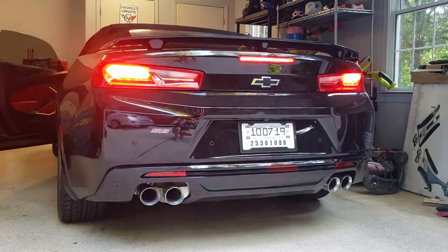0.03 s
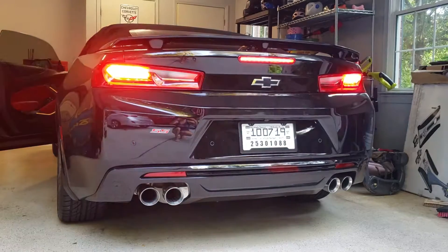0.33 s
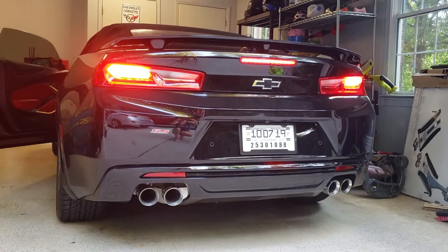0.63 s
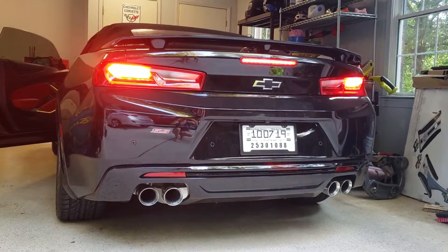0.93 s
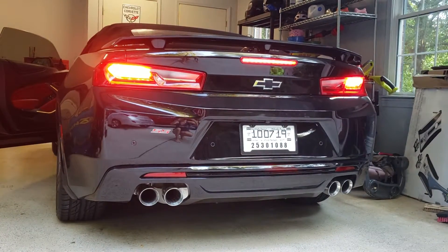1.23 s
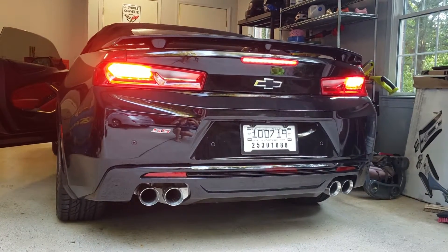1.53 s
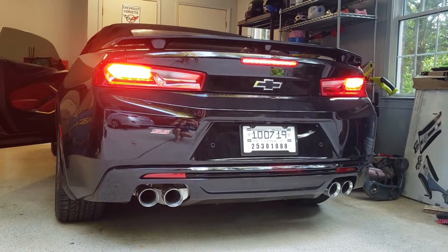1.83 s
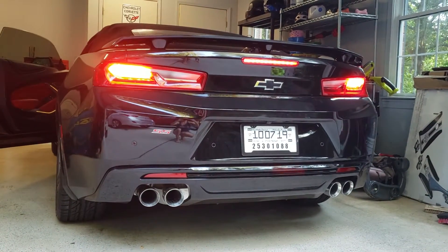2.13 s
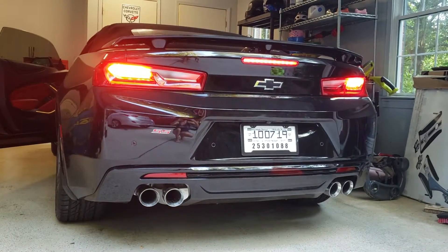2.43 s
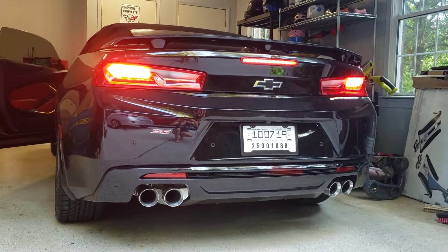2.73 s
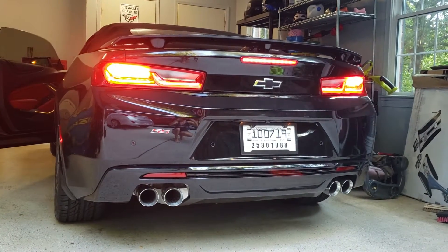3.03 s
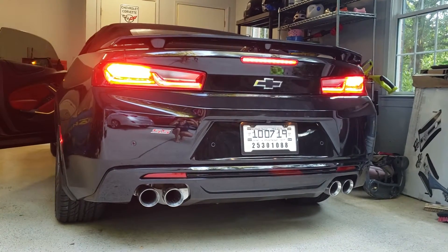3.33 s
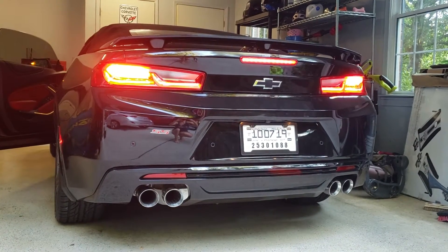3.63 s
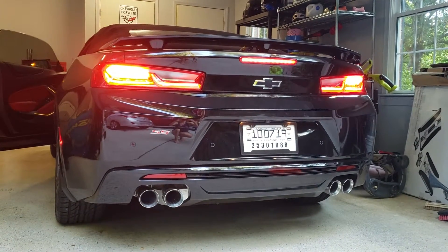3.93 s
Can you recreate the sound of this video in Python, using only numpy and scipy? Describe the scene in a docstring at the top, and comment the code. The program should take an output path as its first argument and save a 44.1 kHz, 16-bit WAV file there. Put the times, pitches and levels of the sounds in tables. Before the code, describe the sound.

A car engine cranks, coughs and catches with a loud, crackling exhaust flare in a garage.

```python
"""A low room rumble, then soft whirs, a whining fuel pump and clicking relays: a cold V8 in a garage,
heard from just behind its tailpipes. The starter's gears clatter and grind through seven compressions.
The engine coughs, catches, flares with a hard crackle and begins to settle to a fast idle.
Each firing rings the exhaust pipe as a thump and leaves its tip as a burst of turbulent gas."""
import sys
import numpy as np
from scipy import signal
from scipy.fft import rfft, irfft
from scipy.io import wavfile
from scipy.ndimage import uniform_filter1d

SR = 44100
rng = np.random.default_rng(int(sys.argv[2]) if len(sys.argv) > 2 else 0)


def transcribe(signal):
    """Save signal, clipped to [-1, 1], as a 16-bit WAV file at the path in sys.argv[1]."""
    frames = np.atleast_2d(signal).T
    limited = np.clip(frames, -1, 1)
    pcm = np.round(limited * 32767).astype(np.int16)
    wavfile.write(sys.argv[1], SR, pcm)


N = 176400
T = np.arange(N) / SR
HZ = np.fft.rfftfreq(N, 1 / SR)


def amp(db):
    """Decibels to gain."""
    return 10 ** (np.asarray(db) / 20)


def unit_rms(x):
    """Scales to rms 1."""
    return x / np.sqrt(np.mean(x ** 2) + 1e-20)


def read(points, hz):
    """Reads a table along a log-frequency axis."""
    f, value = np.transpose(points)
    return np.interp(np.log(hz + 1), np.log(f + 1), value)


def curve(points, t=T):
    """Each column of a time table, joined by straight lines."""
    s, *columns = np.transpose(points)
    return [np.interp(t, s, c) for c in columns]


def add(mix, s, sound):
    """Mixes a sound in at s seconds."""
    part = mix[..., round(s * SR):][..., :sound.shape[-1]]
    part += sound[..., :part.shape[-1]]


def response(points, size=8192):
    """Causal impulse response of a spectrum, energy 1."""
    log_gain = np.log(amp(read(points, abs(np.fft.fftfreq(size, 1 / SR)))))
    h = np.fft.ifft(np.exp(np.conj(signal.hilbert(log_gain)))).real[:size // 2]
    return h / np.linalg.norm(h)


def colour(x, points):
    """Passes channels through an EQ curve."""
    return signal.oaconvolve(x, response(points)[None], axes=1)[:, :N]


def wander(hz):
    """Random drift of rms 1, rolling off above hz."""
    return unit_rms(irfft(rfft(rng.standard_normal(N)) * np.exp(-(HZ / hz) ** 2), N))


def swell(start, rise):
    """A hump that peaks at 1 after its rise time."""
    u = np.maximum(T - start, 0) / rise
    return (u * np.exp(1 - u)) ** 2


def rubbing(hz, width):
    """Stereo noise in a resonance that follows a frequency curve."""
    turn, r = np.exp(2j * np.pi * np.cumsum(hz) / SR), np.exp(-np.pi * width / SR)
    band = signal.lfilter([(1 - r) ** 2], [1, -2 * r, r * r], rng.standard_normal((2, N)) / turn)
    return unit_rms((turn * band).real)


# Stereo image of the room: f/Hz, left-right correlation
LIKENESS = [(60, 1), (130, 0.95), (290, 0.95), (640, 0.52), (1400, 0.079), (3100, 0)]
def diffuse(db):
    """Stereo noise with a given spectrum, centred in the bass and wide on top."""
    a, b = rfft(rng.standard_normal((2, N)))
    same = np.clip(read(LIKENESS, HZ), -1, 1)
    return unit_rms(irfft(np.array([a, same * a + np.sqrt(1 - same ** 2) * b]) * amp(db), N))


# Room tone spectrum: f/Hz, level/dB
ROOM_TONE = [(15, -47), (25, -20), (54, 6), (101, 0), (150, -3.5), (245, -6), (310, -14), (655, -19),
             (1210, -31.5), (1700, -36.5), (3100, -41), (3700, -25), (4400, -47.5), (5600, -36.5),
             (7700, -44.5), (8600, -82), (12000, -47), (15000, -60)]
def room_rumble(level_db=-49, waver_db=1.23):
    """A low bed of noise that wavers slightly."""
    return amp(level_db) * diffuse(read(ROOM_TONE, HZ)) * amp(waver_db * wander(18))


# Whir and hiss cues: t/s, rise/s, centre/Hz, width/octaves, level/dB
WHIR_CUES = [(.04, 0.14, 2500, 0.93, -68), (.54, 0.061, 6700, 0.18, -62), (.6, 0.12, 4200, 0.65, -65.5),
             (.85, 0.18, 5600, 0.06, -72), (1.68, 0.13, 2100, 0.9, -60.5), (1.88, .035, 14000, .22, -73),
             (2.03, 0.097, 2220, 1, -60), (2.08, 0.065, 13500, .17, -64)]
def actuators():
    """Small actuators whir in soft swells of band noise."""
    out = np.zeros((2, N))
    for s, rise, centre_hz, width, db in WHIR_CUES:
        band_db = -4.3 * (np.log2((HZ + 1) / centre_hz) / width) ** 2
        out += amp(db) * swell(s, rise) * diffuse(band_db)
    return out


# Pump pitch and fade: t/s, fundamental/Hz, level/dB
PUMP_RUN = [(.52, 1500, -93), (.56, 1494, -71.5), (.7, 1480, -68), (.78, 1460, -70), (.88, 1465, -73),
            (1.0, 1480, -79), (1.2, 1450, -100)]
# Pump timbre: harmonic number, level/dB
PUMP_PARTIALS = [(2, -1), (3, -6), (4, -21)]
def fuel_pump(flutter_db=4, pitch_waver=.007):
    """The pump primes with a thin, fluttering whine."""
    hz, db = curve(PUMP_RUN)
    turns = np.cumsum(hz * (1 + pitch_waver * wander(230))) / SR
    whine = sum(amp(d) * np.sin(2 * np.pi * k * turns) for k, d in PUMP_PARTIALS)
    return amp(db + flutter_db * wander(70)) * whine


# Relay clicks: t/s, level/dB, ring/Hz
RELAY_CUES = [(.686, -36, 1650), (.708, -33, 1800), (0.83, -45, 2580), (1.319, -49, 5930),
              (1.796, -55, 7500), (2.05, -56, 8000)]
def relays(ring_s=.0022, snap_s=.0011):
    """Each relay clicks with a bright snap and a tiny ring."""
    out, t = np.zeros((2, N)), T[:1000]
    band = signal.butter(2, [1300, 7500], "band", fs=SR)
    for s, db, hz in RELAY_CUES:
        snap = signal.lfilter(*band, rng.standard_normal((2, len(t)))) * np.exp(-t / snap_s)
        ring = np.sin(2 * np.pi * hz * t) * np.exp(-t / ring_s)
        add(out, s, amp(db) * (.39 * ring + .86 * snap))
    return out


# Thin whines: t/s, length/s, f/Hz, level/dB, half-width/Hz
WHINE_CUES = [(.85, 0.19, 1644, -70, 29.4), (0.838, 0.17, 3390, -65, 61.3), (2.478, 0.14, 1925, -31, 60),
              (2.61, 0.12, 605, -32, 60), (2.77, 0.11, 605, -33, 60), (2.915, 0.083, 360, -29.5, 30),
              (2.98, 0.057, 1815, -31, 60), (3.054, 0.18, 355, -35, 34.8)]
def thin_whines(rise_s=.018, sag=.011):
    """Small motors and parts sing in brief, rough tones that sag a little: two while the pump primes, the rest
    shaken by the starter."""
    out = np.zeros((2, N))
    for s, length, hz, db, half_width in WHINE_CUES:
        age = np.clip((T - s) / length, 0, 1)
        pitch = hz * (1 + sag * (.5 - age))
        tone = np.sin(2 * np.pi * np.cumsum(pitch) / SR)
        envelope = np.clip((T - s) / rise_s, 0, 1) * np.sqrt(1 - age)
        out += amp(db) * envelope * (.75 * tone + .47 * rubbing(pitch, 2 * half_width))
    return out


# Garage reverb time: f/Hz, T60/s
GARAGE_DECAY = [(100, 0.19), (1000, 0.98), (4000, 0.081), (15000, 0.12)]
def garage(x, wet_db, size=22050):
    """Direct sound plus dense reflections, unrelated left and right."""
    echoes = rng.standard_normal((2, size)) * (rng.random((2, size)) < .08) * (T[:size] > .003)
    hz, t, z = signal.stft(echoes, SR, nperseg=256)
    tail = signal.istft(z * amp(-60 * t / read(GARAGE_DECAY, hz)[:, None]), SR, nperseg=256)[1]
    tail /= np.linalg.norm(tail, axis=1, keepdims=True)
    return x + amp(wet_db) * signal.fftconvolve(x, tail, axes=1)[:, :N]


def metallic(x, depth_db):
    """Ever-changing metallic resonances: the spectrum swells and dips in short narrow patches."""
    z = signal.stft(x, nperseg=512, noverlap=384)[2]
    patches = uniform_filter1d(rng.standard_normal(z.shape[1:]), size=3, axis=0)
    patches = unit_rms(uniform_filter1d(patches, size=14, axis=1))
    return signal.istft(z * amp(depth_db * patches), nperseg=512, noverlap=384)[1][:, :N]


# Starter fader: t/s, level/dB
STARTER_LEVEL = [(2.165, -88), (2.173, -40), (2.181, -37), (2.186, -27), (2.21, -27.5), (2.26, -35),
                 (2.34, -35), (2.48, -35.5), (2.58, -36.5), (2.78, -35), (3.1, -35), (3.5, -31.5),
                 (3.7, -39), (4.0, -46.5)]
# Gear mesh pitch: t/s, f/Hz
GEAR_MESH = [(2.17, 254), (2.28, 692), (2.42, 915), (2.48, 688), (2.6, 990), (2.66, 827), (2.74, 1020),
             (2.8, 875), (3.0, 1038), (3.28, 1060), (3.6, 1302)]
# Gear clatter EQ: f/Hz, level/dB
GEAR_EQ = [(30, -14), (60, -17), (140, 1), (230, 3), (350, 2.5), (800, 1.5), (1800, 2), (2150, -1.5),
           (3200, 0), (4200, 2.5), (5400, 4), (6900, 1.5), (7700, -2), (8050, -3.5), (8350, -13.5),
           (10500, -6.5), (12000, -4), (13300, -6.5), (15600, -10.5)]
def starter(ticks_per_s=5000, spread_db=3, whine_db=-27.5, scrape_db=-8.5):
    """Gear teeth clatter, scrape and whine, a touch louder under the load of each compression."""
    ticks = (rng.random((2, N)) < ticks_per_s / SR) * rng.choice([-1, 1], (2, N))
    ticks = unit_rms(ticks * amp(spread_db * np.minimum(rng.exponential(1, (2, N)), 4)))
    mesh_hz = curve(GEAR_MESH)[0]
    turns = np.cumsum(mesh_hz * (1 + .012 * wander(59.1))) / SR
    whine = unit_rms(sum(np.sin(2 * np.pi * (k * turns + rng.random())) for k in range(2, 9)))
    scrape = rubbing(6.75 * mesh_hz, width=1100)
    load = sum(swell(s, GRIND_RISE_S) for s, _, _ in COMPRESSIONS)
    fader = amp(curve(STARTER_LEVEL)[0]) * (1 + .049 * load) * (T > STARTER_LEVEL[0][0])
    gears = (ticks + amp(whine_db) * whine + amp(scrape_db) * scrape) * fader
    return metallic(garage(colour(gears, GEAR_EQ), wet_db=-3), depth_db=2.5)


GRIND_RISE_S, PUFF_RISE_S = .033, .014
# Compression strokes: t/s, puff/dB, grind/dB
COMPRESSIONS = [(2.406, -37.5, -32), (2.604, -35.5, -29), (2.746, -32.5, -28), (2.865, -34.5, -29.5),
                (2.97, -34, -29.5), (3.074, -30.5, -27), (3.168, -40.5, -29.5)]
# Tailpipe puff spectrum: f/Hz, level/dB
PUFF_EQ = [(20, -43), (48, 15.5), (80, -16), (135, 8), (200, -13), (280, -7), (450, -46), (2000, -68)]
# Loaded gear spectrum: f/Hz, level/dB
GRIND_EQ = [(100, -32), (270, 6.5), (450, -6.5), (620, -0.5), (850, -1.5), (1200, 3), (1800, -1.5),
            (2600, -4), (6000, -6.5), (8500, -17), (16000, -16.5)]
def compressions():
    """Each stroke grinds the starter's gears and pushes a low puff of air from the pipe."""
    grind = diffuse(read(GRIND_EQ, HZ)) * sum(amp(db) * swell(s, GRIND_RISE_S) for s, _, db in COMPRESSIONS)
    air = diffuse(read(PUFF_EQ, HZ)) * sum(amp(db) * swell(s, PUFF_RISE_S) for s, db, _ in COMPRESSIONS)
    puffs, puff = np.zeros(N), response(PUFF_EQ)
    for s, db, _ in COMPRESSIONS:
        add(puffs, s, amp(db) * puff / abs(puff).max())
    return grind + puffs + air


BOOM_RISE_S, LEAD_S, RASP_DECAY_S = .012, .0011, .011
# First uneven firings: t/s, thump/dB, crackle/dB, boom/dB, boom/Hz
COUGH_CUES = [(3.29, -13.5, -24.5, -9, 50), (3.358, -11, -21, -10, 50), (3.413, -10.5, -31, -11, 88),
              (3.43, -4.5, -23, -6.5, 58.6), (3.444, -7.5, -32, -14.5, 54), (3.467, -7, -25, -11, 69),
              (3.4786, -9, -19, -17, 79)]
def cough_booms(decay_s=.019, lag_s=.0019):
    """Each cough sets off a short bass boom in the exhaust."""
    out, t = np.zeros(N), T[:8192]
    envelope = (1 - np.exp(-t / BOOM_RISE_S)) * np.exp(-t / decay_s)
    for s, _, _, db, hz in COUGH_CUES:
        boom = -np.sin(2 * np.pi * hz * t) * envelope
        add(out, s + lag_s, amp(db) * boom / abs(boom).max())
    return out


# Rev curve: t/s, firing rate/Hz
REVS = [(3.49, 68), (3.52, 88), (3.5825, 97), (3.64, 104), (3.74, 105), (3.85, 106.5), (4.0, 101)]
# Engine effort: t/s, thump/dB, crackle/dB
ENGINE_LEVELS = [(3.49, -7.5, -18), (3.52, -8, -15.5), (3.55, -3.5, -13.5), (3.6, -5, -10), (3.7, -7, -21),
                 (3.74, -8, -26), (3.79, -7.5, -26), (3.85, -8, -26.5), (3.91, -12.5, -29.5),
                 (4.0, -11, -35.5)]
# Cylinder accents in firing order: thump/dB, crackle/dB
ACCENTS = [(-2, 0.5), (-7, -3.5), (-0.5, -7), (-3, -3), (-3, -4), (-4, -3), (-2, -6.5), (-4.5, -11)]
def engine_firings(catch_s=3.4918, jitter_s=.0004, scatter_db=(1.8, 1.2)):
    """Eight uneven cylinders fire in turn; returns rows of t/s, thump/dB, crackle/dB."""
    count = np.cumsum(curve(REVS)[0] * (T >= catch_s)) / SR
    s = T[np.flatnonzero(np.diff(np.ceil(count)))]
    scatter = rng.standard_normal((100, 3))[:len(s)] * [jitter_s, *scatter_db]
    accents = np.array(ACCENTS)[np.arange(len(s)) % len(ACCENTS)]
    return np.column_stack([s, np.transpose(curve(ENGINE_LEVELS, s)) + accents]) + scatter


# Exhaust pipe resonances: f/Hz, level/dB
PIPE_EQ = [(10, -69), (30, -23), (50, -2), (75, 7), (105, 4.5), (135, 3), (165, 3), (210, 0.5), (245, 1.5),
           (268, 6), (298, -20), (370, -16.5), (430, -9), (490, -18.5), (545, -8), (578, -26), (620, -8.5),
           (665, -6.5), (790, -27), (850, -22.5), (950, -30.5), (2000, -45), (5000, -104)]
def pipe_thumps(firings, slow_valve_hz=250, cough_tail_s=.035, burble_db=-17.5):
    """Firings ring the pipe and rushing gas burbles in it; slowly opening valves dull the coughs."""
    pipe, t = response(PIPE_EQ, size=32768), T[:8192]
    pipe /= abs(pipe).max()
    dull = signal.sosfilt(signal.butter(2, slow_valve_hz, fs=SR, output="sos"), pipe)
    cough_flow = (1 - np.exp(-t / BOOM_RISE_S)) * np.exp(-t / cough_tail_s)
    rasp = np.exp(-t / RASP_DECAY_S)
    thumps, flow = np.zeros((2, N))
    for s, db, *_ in COUGH_CUES:
        add(thumps, s - LEAD_S, amp(db) * dull)
        add(flow, s, amp(db) * rasp + amp(db - 1) * cough_flow)
    for s, db, _ in firings:
        add(thumps, s - LEAD_S, amp(db) * pipe)
        add(flow, s, amp(db) * rasp)
    return thumps + amp(burble_db) * colour(flow * rng.standard_normal((1, N)), PIPE_EQ)[0]


# Firings that leave the pipe as a hard pop: t/s, level/dB
HARD_POPS = [(3.5823, -10), (3.6237, -6), (3.662, -10.5), (3.7003, -7.5), (3.8141, -18.5), (3.890, -24)]
# Tailpipe crackle EQ: f/Hz, level/dB
CRACKLE_EQ = [(100, -43.5), (400, -4.5), (680, 1.5), (900, -14.5), (1150, -3.5), (1550, 5), (2000, -4),
              (2350, -4), (2700, 2.5), (3000, -1.5), (3200, -13.5), (3420, -6.5), (3700, -15),
              (4500, -12.5), (7500, -28), (8600, -48), (16000, -28)]
def tip_crackle(firings, rise_s=.00024, crack_s=.002, pop_s=.0026, rasp_db=-11, right_lag_s=.00007):
    """Coughs chuff from the tip; later firings leave it as a shock with a burst of turbulence."""
    t = T[:8192]
    shocks, gas = np.zeros((2, N))
    opening = 1 - np.exp(-t / rise_s)
    burst = opening * (np.exp(-t / crack_s) + amp(rasp_db) * np.exp(-t / RASP_DECAY_S))
    for s, _, db, _, _ in COUGH_CUES:
        gas += amp(db - 3) * swell(s - LEAD_S, rise=.0043)
    for s, _, db in firings:
        if min(abs(s - pop) for pop, _ in HARD_POPS) > .004:  # else a pop takes its place
            add(shocks, s, amp(db) * np.array([-3]))
            add(gas, s, amp(db) * burst)
    for s, db in HARD_POPS:
        add(shocks, s, amp(db) * np.array([-4]))
        add(gas, s, amp(db) * opening * np.exp(-t / pop_s))
    crack = shocks + gas * rng.standard_normal(N)
    return colour(np.array([crack, np.roll(crack, round(right_lag_s * SR))]), CRACKLE_EQ)


def exhaust():
    """Centred, nearly dry thumps under a crackle that splashes off the garage walls."""
    firings = engine_firings()
    lows = cough_booms() + pipe_thumps(firings)
    crackle = tip_crackle(firings)
    return garage(np.array([lows, lows]), wet_db=-23) + amp(1) * garage(crackle, wet_db=-9)


# Stereo balance: f/Hz, left minus right/dB
BALANCE = [(60, -0.3), (200, 0), (700, 2.5), (1300, 5), (2400, 4.5), (4400, -2), (8000, 4), (15000, 0.5)]
def scene():
    """The car over the rumble of the room; the nearer tailpipes are on the left."""
    mix = room_rumble() + fuel_pump() + relays() + actuators()
    mix += starter() + compressions() + thin_whines() + exhaust()
    lean_db = read(BALANCE, np.fft.rfftfreq(2 * N, 1 / SR))
    return irfft(rfft(mix, 2 * N) * amp(np.outer([.5, -.5], lean_db)))[:, :N]


def record(dry, open_s=.1, low_cut_hz=27, high_cut_hz=15850):
    """The sound cuts in, sheds its deepest bass, clips at full scale and loses its very top."""
    low_cut = signal.butter(4, low_cut_hz, "high", fs=SR, output="sos")
    clipped = np.clip(signal.sosfilt(low_cut, dry * (T > open_s)), -1, 1)
    high_cut = signal.firwin(511, high_cut_hz, window=("kaiser", 9), fs=SR)
    return signal.oaconvolve(clipped, high_cut[None], "same")


dry = scene()
out = record(dry)
transcribe(out)
```